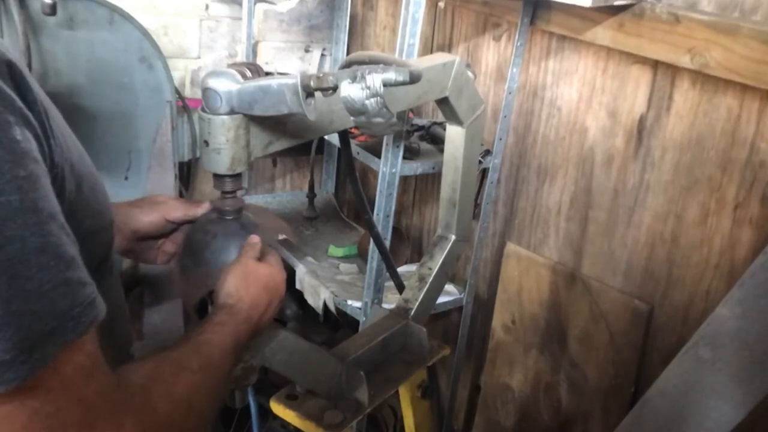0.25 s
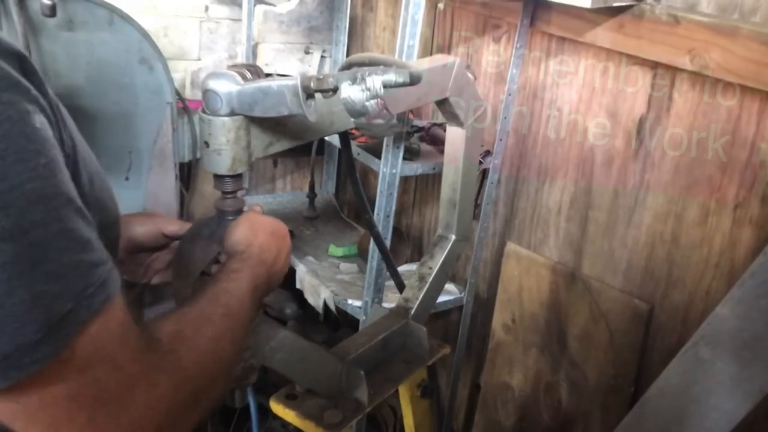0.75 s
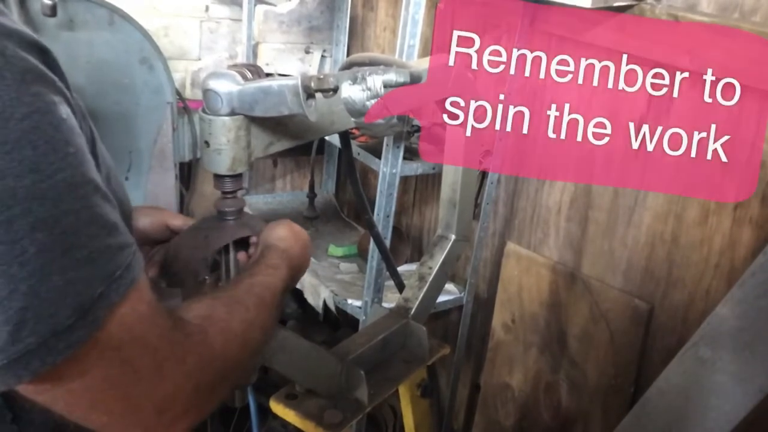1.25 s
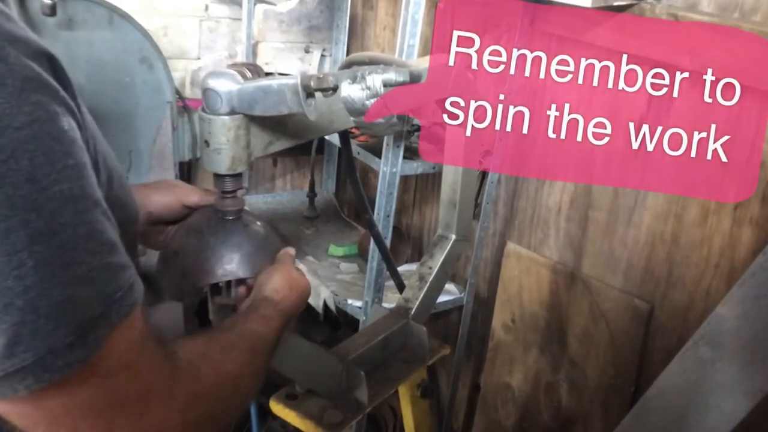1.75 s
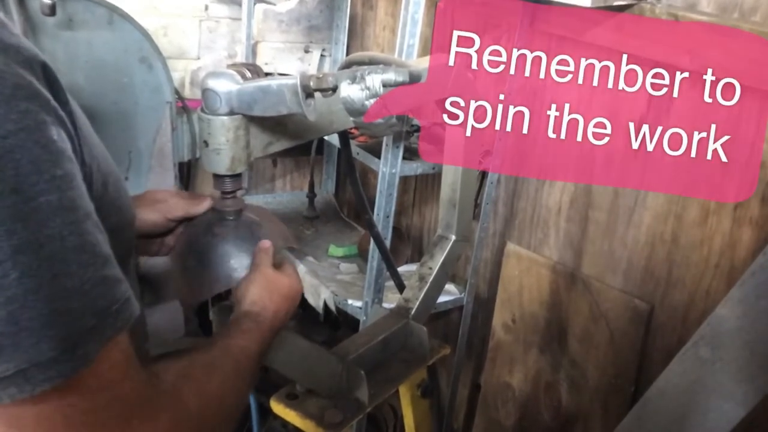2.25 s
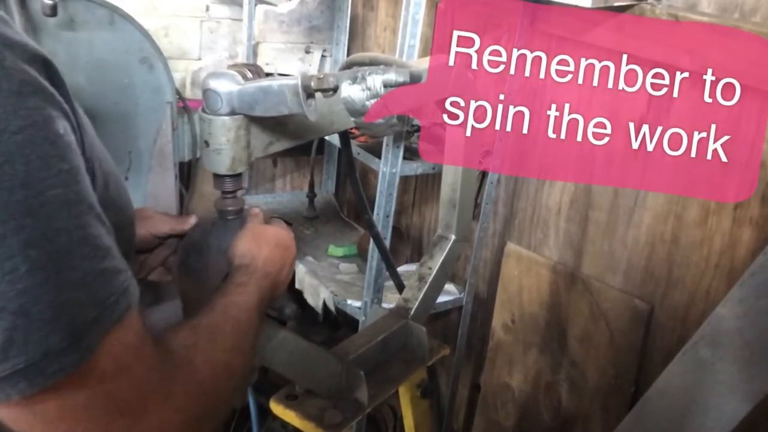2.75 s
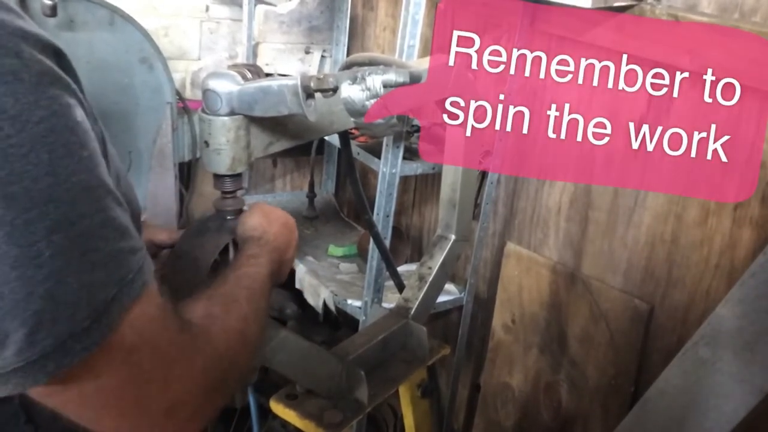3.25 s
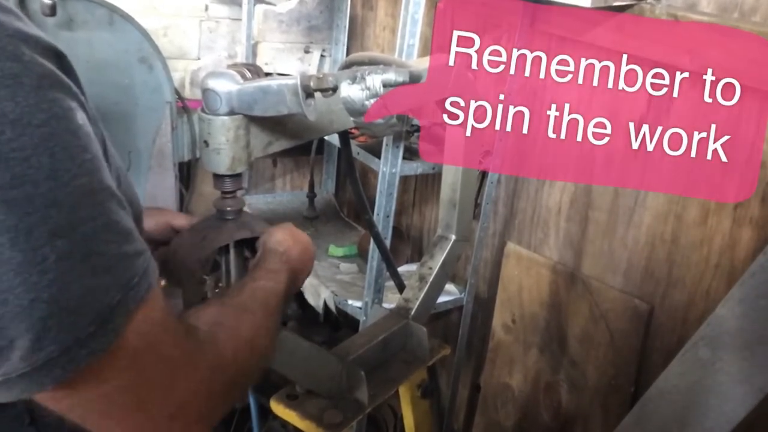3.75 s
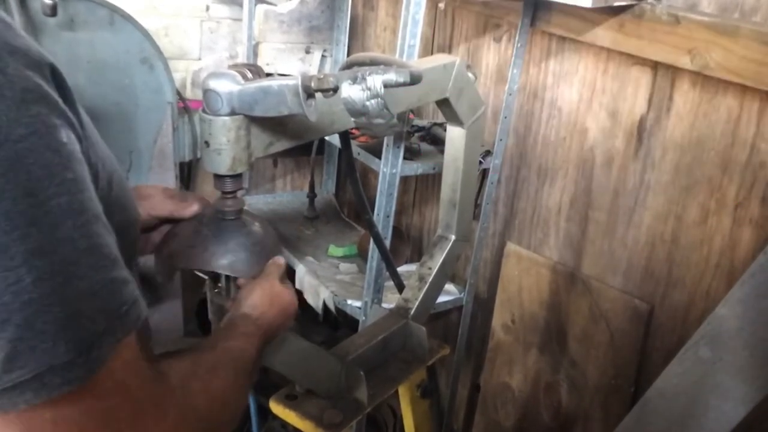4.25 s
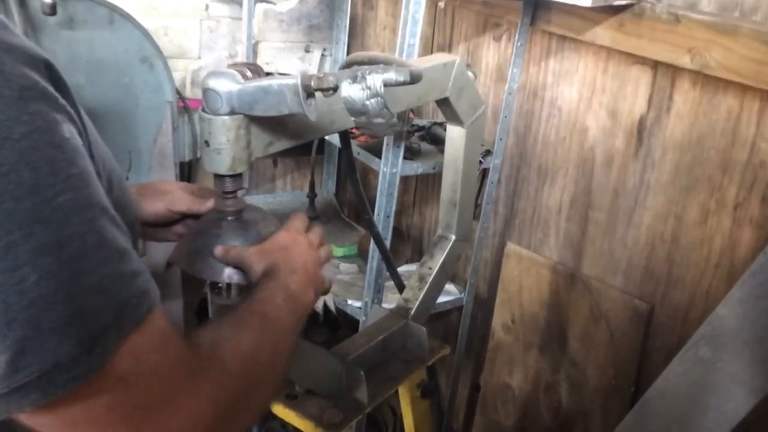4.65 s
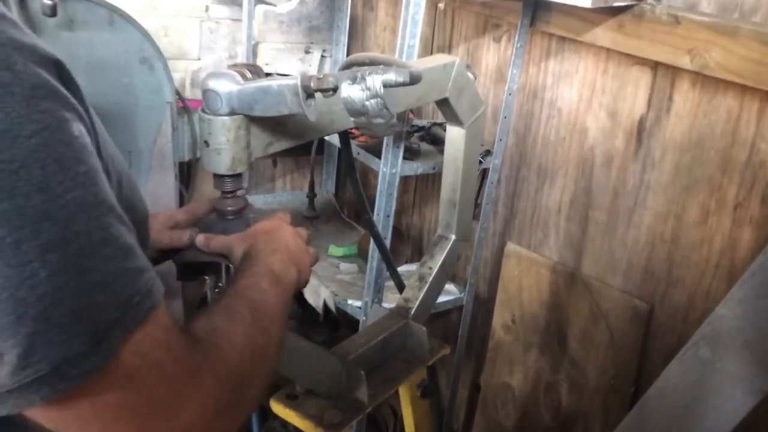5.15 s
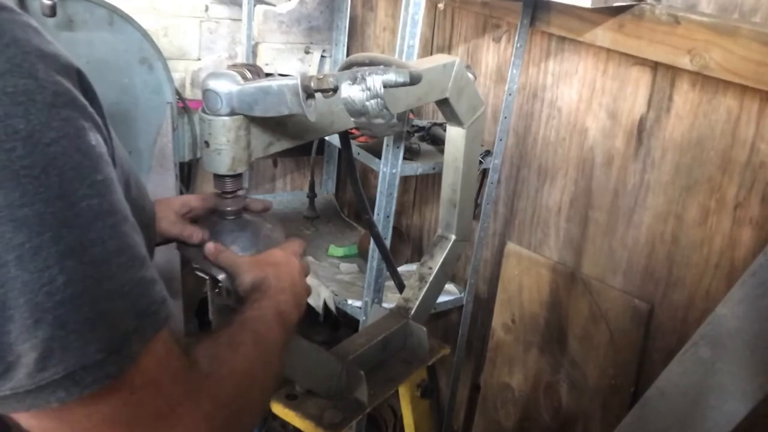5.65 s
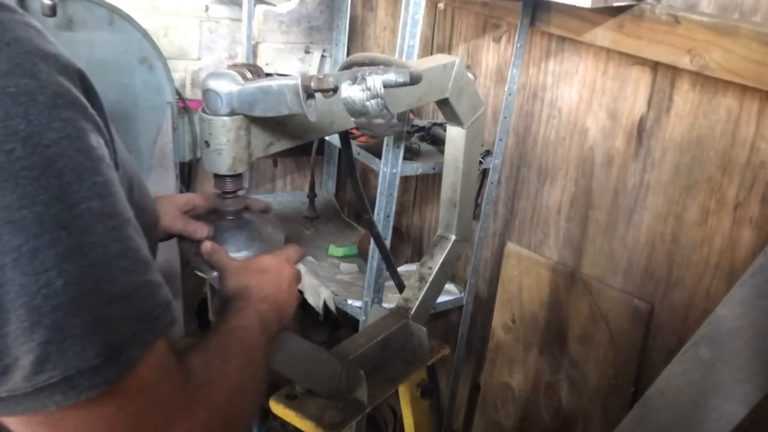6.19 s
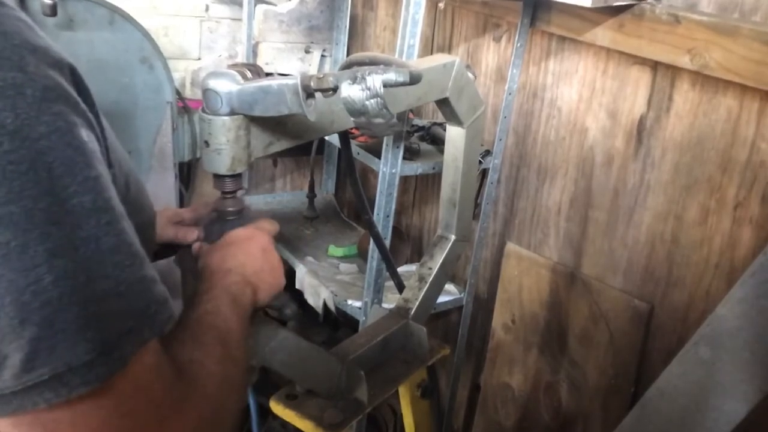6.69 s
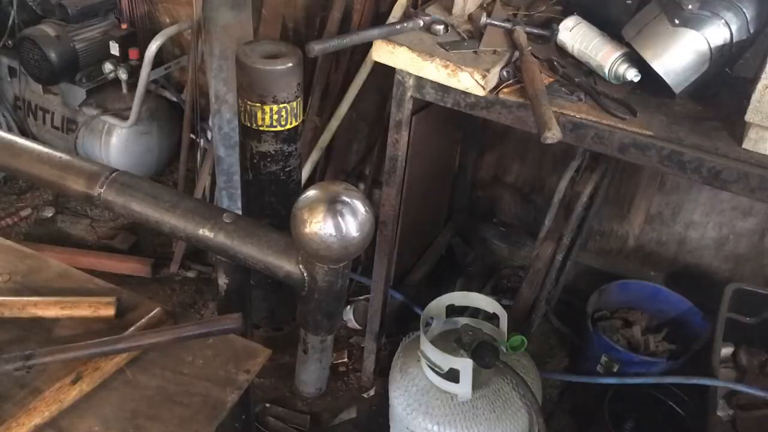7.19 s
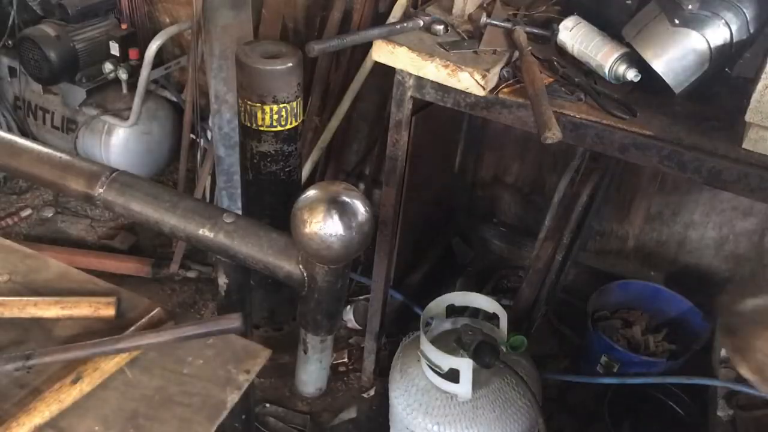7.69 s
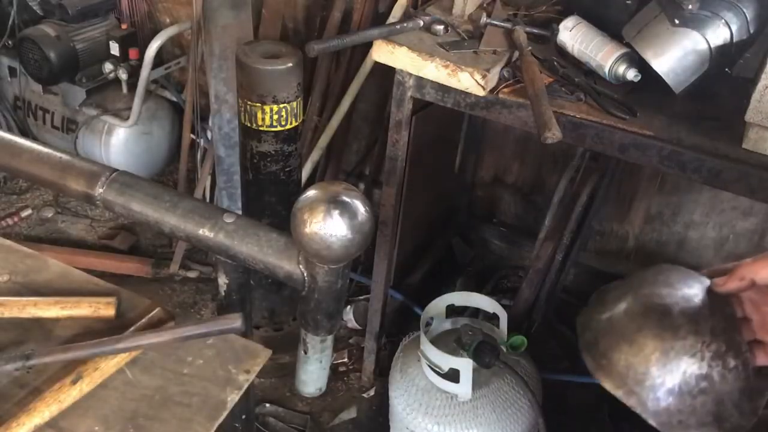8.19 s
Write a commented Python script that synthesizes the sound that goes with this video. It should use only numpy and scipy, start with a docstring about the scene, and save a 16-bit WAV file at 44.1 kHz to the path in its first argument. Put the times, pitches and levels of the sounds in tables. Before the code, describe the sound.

From the very start, a pneumatic hammer pounds a steel bowl close by in a small wooden workshop. The blows come dozens of times a second, merging into a loud, continuous metallic rattle with a bright sizzling edge and fluttering puffs of air. A compressor throbs low beneath it. The pace stumbles slightly and the tone shifts as the bowl is turned, ringing more clearly around 3 seconds and swelling and dipping unevenly between 5 and 7 seconds. At about 7.1 seconds the hammer and compressor cut off abruptly. A faint, even hiss remains, with barely audible thin, wavering high tones. Soft shuffling steps and dull handling knocks come at around 7.4 to 7.7 seconds and again from 8.1 to 8.4 seconds, with a little grit underfoot and a faint rub from the carried bowl.

```python
"""A loud metallic rattle: a pneumatic planishing hammer beats a hand-held steel bowl about 37 times a
second in a small wooden workshop. Each blow puffs air, slaps the bowl onto the anvil and excites the
modes of bowl and dies; the tone shifts as the bowl is turned. A compressor throbs behind. The sound cuts
abruptly from the din to quiet hiss, a few shuffling steps and the knocks of the bowl being carried.
Faint, thin, wavering high tones lie over the hiss; they come from nothing in the shop."""
import sys
import numpy as np
from scipy import signal
from scipy.fft import rfft, irfft, next_fast_len
from scipy.io import wavfile
from scipy.ndimage import uniform_filter1d, map_coordinates

SR = 44100
rng = np.random.default_rng(int(sys.argv[2]) if len(sys.argv) > 2 else 0)


def write(x):
    x = np.atleast_2d(x).T
    wavfile.write(sys.argv[1], SR, np.round(np.clip(x, -1, 1) * 32767).astype(np.int16))


N = 371755
TIME = np.arange(N) / SR
AGE = np.arange(8192) / SR  # seconds since an event began
CUT_S = 7.069  # the sound cuts from the din to quiet


# How firmly the die bears on the bowl. Each row: time in seconds, level in dB.
PRESSURE = [(0.0, -0.3), (0.65, -2), (0.83, 2.5), (1.96, -3.5), (2.02, 2), (2.67, -3), (2.97, 2.5),
            (4.52, -1.3), (4.63, 0.5), (5.23, -0.4), (5.35, 3.5), (5.47, -4.5), (5.76, 2.2), (6.06, -0.7),
            (6.3, 4), (6.65, -3.5), (6.89, 5), (7.07, -9.5)]
def hammer():
    """Impact excitation: each stroke vents air and strikes the bowl; firm contact rings louder."""
    times, force_db, seat_db = blows()
    press_db = np.interp(times, *np.transpose(PRESSURE))
    slap = wall_echoes(filtered(bowl_slap(times, seat_db), frame_response))
    steel = shell_clash(times, force_db, press_db)
    steel += bowl_ring(times, force_db, press_db)
    steel += die_ring(times, force_db, press_db)
    air = exhaust(times, force_db)
    return slap + steel + air + reverberation(amp(-4.5) * steel + amp(-7.5) * air + amp(-2.5) * slap)


# The piston's pace, stumbling as the bowl shifts. Each row: time in seconds, blows per second.
PISTON_RATE = [(0.0, 37.511), (1.01, 37.901), (1.66, 37.091), (1.84, 36.001), (2.08, 39.393),
               (2.14, 33.155), (2.44, 40.494), (2.67, 36.107), (3.56, 38.785), (3.68, 34.166),
               (3.8, 40.056), (4.34, 36.289), (4.4, 41.673), (4.46, 37.6), (6.24, 37.309), (6.36, 40.672),
               (6.54, 35.732), (7.07, 39.151)]
# How flush the bowl sits on the anvil. Each row: time in seconds, seating in dB.
SEATING = [(0, 2), (.38, 2.5), (1.04, -5.5), (1.13, 2.5), (1.47, 4.5), (1.64, -3.5), (1.75, 6),
           (1.96, -3.5), (2.08, 5.5), (2.6, 3.5), (3.42, -4.5), (4.02, -2.5), (4.15, 4), (4.5, 4),
           (4.87, -1), (4.94, 6.5), (5.59, 5.5), (5.76, -11.5), (6.1, 5), (6.3, -1), (6.45, 4.5),
           (6.92, -2), (6.99, 7)]
# Hard or glancing blows. Each row: time in seconds, extra force in dB, extra seating in dB.
ACCENTED_BLOWS = [(.16, 3, 1.5), (.34, 1.5, 4.5), (.74, 1.5, 0), (.9, 3.5, 1), (1.03, -5.5, -3),
                  (1.05, 1, 4.5), (1.29, 5, -2.5), (1.5, 3, 1.5), (1.67, 7, -1), (1.72, 6.5, 0.5),
                  (1.86, -9, -5), (1.91, 4, 5.5), (2.05, 4.5, 1.5), (2.48, 5, 1), (2.63, 1, 1),
                  (2.74, 3.5, -1), (2.88, 2, 1), (2.96, 3.5, 2.5), (3.01, 3.5, 3.5), (3.39, -1.5, -3),
                  (3.76, 1.5, -13), (3.94, 2.5, 3.5), (4.22, 2, 1.5), (4.84, -6, -1.5), (4.92, 4, 0),
                  (5.5, 5, 3), (5.58, -1.5, 1), (5.61, 2, 1.5), (5.71, 0.5, 6.5), (5.85, -1.5, 14.5),
                  (5.9, 0.5, 12), (5.98, 3, -6), (6.03, -3, 7), (6.06, -4, 1.5), (6.12, 3, 0.5),
                  (6.38, 1.5, 1.5), (6.7, -0.5, 4.5), (7.02, -2, -1.5)]
def blows(flush_db=10, rock_range_db=6, square_hit_db=2):
    """An impulse train: each blow's time, force and seating. A badly seated bowl rocks unevenly."""
    strokes = np.cumsum(np.interp(TIME, *np.transpose(PISTON_RATE))) / SR + .29
    times = TIME[1:][np.diff(np.floor(strokes)) > 0]
    times = times[times < CUT_S]
    slip, force, rock = rng.standard_normal((len(times), 3)).T
    times = times + .0004 * slip
    seat_db = np.interp(times, *np.transpose(SEATING))
    looseness = np.clip((flush_db - seat_db) / rock_range_db, 0, 1)
    force_db = np.minimum(2.5 * force, square_hit_db)
    rock_db = 3 * looseness * rock
    for when, accent_force_db, accent_seat_db in ACCENTED_BLOWS:
        blow = np.argmin(np.abs(times - when))
        force_db[blow], rock_db[blow] = accent_force_db, accent_seat_db
    return times, force_db, np.minimum(seat_db + rock_db, flush_db)


# The bowl's thud on the anvil. Each row: frequency in Hz, spectral density in dB.
SLAP_SPECTRUM = [(150, -57.5), (350, -14.5), (620, -20), (850, 0.5), (1100, 0.5), (1450, 0), (1800, -7.5),
                 (2300, -6.5), (3200, -57), (5000, -38)]
def bowl_slap(times, seat_db, dispersion=0.0988):
    """Dispersion: high bending waves outrun low ones, so each slap falls in pitch."""
    hz = np.fft.rfftfreq(len(AGE), 1 / SR)
    wave = irfft(amp(along(SLAP_SPECTRUM, hz)) * np.exp(-2j * np.pi * dispersion * np.sqrt(hz)))
    wave *= AGE < AGE[-1] / 2
    return place(times, -14 + 1.306 * seat_db, wave / np.abs(wave).max())  # flusher is heavier


# Modes of the frame and stand. Each row: frequency in Hz, bandwidth in Hz, gain in dB.
FRAME_MODES = [(614.5, 37, 8.5), (822, 14, -0.5), (962, 16, 1), (1081, 6.2, 4.5), (1216, 53, -3.5),
               (1455, 10, -12.5), (1551, 10, -3), (1792, 13, 1), (1920, 23, 8)]
def frame_response(hz):
    """Forced resonance: the slap passes straight on and also drives the frame's modes."""
    return 1 + sum(amp(db) * 1j * hz * width / (mode * mode - hz * hz + 1j * hz * width)
                   for mode, width, db in FRAME_MODES)


# The shell's clash and its higher sizzle. Each row: frequency in Hz, spectral density in dB.
CLASH_SPECTRUM = [(300, -29.5), (600, -0.5), (1000, -5.5), (1900, 0), (2800, 2.5), (3700, 0), (4500, 2.5),
                  (5100, -1), (5900, 4.5), (7200, 1), (9000, -16), (12000, -21.5)]
SIZZLE_SPECTRUM = [(4000, -25.5), (6500, -6), (9500, -3.5), (10400, 0.5), (11400, 4), (12600, 7.5),
                   (14000, -1.5), (14700, 20), (15250, -5), (16000, 6)]
def shell_clash(times, force_db, press_db):
    """High modal density: the shell's crowded modes merge into bursts of noise."""
    clash = bursts(times, CLASH_SPECTRUM, t60=0.076, attack=0.00069, ripple_db=2.5, chatter=0.0062)
    sizzle = bursts(times, SIZZLE_SPECTRUM, t60=0.048, attack=0.00018, ripple_db=4.5, chatter=0.0011)
    return (place(times, -21 + 1.07 * press_db + force_db, clash)
            + place(times, -13.5 + 0.79 * press_db + force_db, sizzle))


# The rim's dense modes. Each row: frequency in Hz, spectral density in dB.
RIM_SPECTRUM = [(6000, -27), (7400, -30.5), (7720, -1.5), (7950, -10), (8550, 1.5), (8900, -22.5),
                (9250, -1.5), (11000, -27)]
# Clear notes of body and rim. Each row: frequency in Hz, level in dB, 60 dB decay time in seconds.
BODY_MODES = [(1850, -30, .085), (2150, -39, .07), (2305, -31, .07), (2845, -30.5, .06), (3100, -38, .07)]
RIM_MODES = [(8600, -25, .03), (8848, -21, .08)]
# The body rings out when tilted on edge, the rim as it turns. Each row: time in seconds, level in dB.
BODY_LEVEL = [(0, -7.5), (2.852, -1), (3.0, 6.5), (3.301, 7.5), (3.5, -15), (7.07, -6.5)]
RIM_TURNING = [(0, 0), (1.0, -5), (1.7, 2.5), (2.1, 1), (2.5, -3.5), (3.1, -1), (3.4, 2), (4.7, 2),
               (5.45, -4.5), (6.15, -4), (6.85, 3)]
def bowl_ring(times, force_db, press_db):
    """Free vibration: body and rim ring after each blow, as strongly as the bowl's position allows."""
    body_db = np.interp(times, *np.transpose(BODY_LEVEL)) + force_db / 2
    rim_db = np.interp(times, *np.transpose(RIM_TURNING)) + 1.57 * press_db + force_db
    shimmer = bursts(times, RIM_SPECTRUM, t60=0.026, attack=0.00052, ripple_db=4, chatter=0.0064)
    body = ringing(times, BODY_MODES, scatter_db=2.5, detune=0.0025)
    rim = ringing(times, RIM_MODES, scatter_db=3.5, detune=0.0015)
    return place(times, rim_db - 23.5, shimmer) + place(times, body_db, body) + place(times, rim_db - 5, rim)


# Notes of anvil and hammer die. Each row: frequency in Hz, level in dB, 60 dB decay time in seconds.
ANVIL_MODES = [(6404, -19, 0.062), (6485, -18, 0.069)]
DIE_MODES = [(14812, -15, .07), (14790, -17, .025)]
def die_ring(times, force_db, press_db):
    """Normal modes: small, stiff blocks of steel ring at a few high frequencies."""
    anvil = ringing(times, ANVIL_MODES, scatter_db=4.5, detune=0.0031)
    die = ringing(times, DIE_MODES, scatter_db=6, detune=0.00108)
    return place(times, -4 + press_db + 0.85 * force_db, anvil) + place(times, -5.5 + force_db, die)


# The vented air. Each row: frequency in Hz, spectral density in dB.
EXHAUST_SPECTRUM = [(35, -28), (70, -4.5), (130, -3.5), (165, -16), (220, -6.5), (280, -5.5), (350, -3),
                    (480, -3), (700, -12), (1500, -14)]
def exhaust(times, force_db, pop_hz=250, lead_s=0.004):
    """Sudden expansion: the port opens just before the die lands, with a low pop and a short rush."""
    pop = np.sin(2 * np.pi * pop_hz * AGE) * AGE * np.exp(-AGE / 0.0019)
    opening = times - lead_s + 0.00077 * rng.standard_normal(len(times))
    rush = bursts(times, EXHAUST_SPECTRUM, t60=0.11, attack=0.00034, ripple_db=1.9)
    return place(opening, force_db / 10 - 24, pop / pop.max() + rush)


# Echoes off the bench and wooden walls. Each row: delay in seconds, linear gain.
REFLECTIONS = [(.00275, 0.18), (.0035, 0.23), (.0058, -0.11), (0.0106, 0.036), (0.0112, 0.3), (0.0107, .16),
               (.01455, -0.084), (0.0204, 0.034)]
def wall_echoes(x):
    """Early reflection: nearby surfaces return delayed, weaker copies."""
    return x + sum(gain * np.pad(x, (round(delay * SR), 0))[:N] for delay, gain in REFLECTIONS)


# The workshop's decay. Each row: frequency in Hz, reverberation time in seconds.
ROOM_DECAY = [(100, 0.55), (1000, 0.33), (5000, 0.2), (15000, 0.34)]
def reverberation(x):
    """A diffuse field: a short noisy tail, drawn afresh every 0.2 s so no steady colour builds up."""
    block, predelay = SR // 5, SR // 300
    out = np.zeros(N + SR)
    for start in range(0, N, block):
        hz, t, noise = signal.stft(rng.standard_normal(SR // 3), SR, nperseg=256)
        decay = amp(-60 * t / along(ROOM_DECAY, hz)[:, None])
        tail = signal.istft(noise * decay, SR, nperseg=256)[1]
        wet = signal.fftconvolve(x[start:start + block], tail / np.linalg.norm(tail))
        out[start + predelay:][:len(wet)] += wet
    return out[:N]


# The pump's throb. Each row: harmonic number of the stroke rate, level in dB.
PUMP_HARMONICS = [(3, -53), (4, -52.5), (13, -40.5), (14, -36.5), (15, -38.5), (16, -70.5), (17, -51)]
def compressor(stroke_hz=24.256, motor_hz=51.5):
    """A harmonic series: pump strokes throb in the intake's resonance over a steady motor hum."""
    turns = stroke_hz * TIME + 0.0043 * wobble(3)
    pump = sum(amp(db + wobble(3.2)) * np.cos(2 * np.pi * round(k) * turns) for k, db in PUMP_HARMONICS)
    motor = amp(-37.5 + 0.46 * wobble(4)) * np.sin(2 * np.pi * motor_hz * TIME)
    return np.sqrt(2) * (pump + motor)


# Steps and handling knocks. Each row: start in seconds, relative level in dB, scuff offset in dB.
FOOTFALLS = [(7.392, -38, -28), (7.414, -44, -14), (7.481, -32, -11.5), (7.504, -35, -18), (7.689, -54, -3),
             (8.137, -36, -14), (8.179, -51, -10), (8.28, -37, -15), (8.334, -49.5, -1.5), (8.409, -54, -2)]
# Thump, scuff and grit under a shoe. Each row: frequency in Hz, spectral density in dB.
THUMP_SPECTRUM = [(30, -14), (70, -8), (130, -10), (215, -2), (330, -14), (600, -23.5), (1500, -40)]
SCUFF_SPECTRUM = [(200, -9), (500, 4), (1300, 7), (2400, -5), (4000, -12), (9000, -25), (15000, -22)]
GRIT_SPECTRUM = [(3000, -20), (6000, -3), (9000, 5), (12000, -4), (16000, -12)]
def steps(grit_s=8.152, rub_start_s=8.23):
    """Impact and friction: shoes thump and scuff the floor, then the carried bowl rubs."""
    times, db, scuff_db = np.transpose(FOOTFALLS)
    thump = bursts(times, THUMP_SPECTRUM, t60=0.26, attack=0.0025, ripple_db=5, chatter=0.0036)
    scuff = bursts(times, SCUFF_SPECTRUM, t60=0.22, attack=0.00073, ripple_db=8)
    grit = bursts([grit_s], GRIT_SPECTRUM, t60=0.18, attack=0.004, ripple_db=2)
    rub = coloured_noise(SCUFF_SPECTRUM) * amp(-63 + 3.7 * wobble(46))
    rub *= np.clip((TIME - rub_start_s) / .04, 0, 1)
    return (place(times, db - 11, thump) + place(times, db + scuff_db + 1.5, scuff)
            + place([grit_s], [-47], grit) + rub)


# The background hiss. Each row: frequency in Hz, spectral density in dB.
HISS_SPECTRUM = [(15, -27), (25, -5), (55, 4.5), (102, -3.5), (222, -3), (425, -8), (1250, -9.5),
                 (2150, -15), (3300, -8.5), (4950, -14), (6850, -8), (8970, -10.5), (11100, -7),
                 (14200, -4.5), (15800, -15.5)]
def hiss():
    """Stationary noise: a faint, even background."""
    return amp(-55) * coloured_noise(HISS_SPECTRUM)


# Faint high tones. Each row: frequency in Hz, level in dB.
HIGH_TONES = [(6029, -73), (10804, -73), (13857, -72)]
def wavering_tones():
    """Random modulation: thin high tones, from nothing in the shop, waver in level and phase."""
    return sum(np.sqrt(2) * amp(db + 2 * wobble(20)) * np.sin(2 * np.pi * (hz * TIME + .3 * wobble(60)))
               for hz, db in HIGH_TONES)


def bursts(times, spectrum, t60, attack, ripple_db, chatter=0):
    """Exponential decay of one noise burst per event, held up for about chatter seconds by rebounds."""
    hz, t = np.fft.rfftfreq(len(AGE), 1 / SR), AGE.astype(np.float32)
    white, ripple = [rng.standard_normal((len(times), len(axis)), np.float32) for axis in (AGE, hz)]
    # neighbouring events favour the same modes
    ripple = unit(uniform_filter1d(uniform_filter1d(ripple, size=36, axis=1), size=3, axis=0))
    cloud = unit(irfft(rfft(white) * amp(along(spectrum, hz).astype(np.float32) + ripple_db * ripple)))
    hold = 2 * chatter * rng.random((len(times), 1), np.float32)
    return cloud * amp(-60 * np.maximum(t - hold, 0) / t60) * (1 - np.exp(-t / attack))


def ringing(times, modes, scatter_db, detune):
    """Damped oscillators, with new strength, phase and slight detuning at each blow."""
    t, out = AGE.astype(np.float32), 0
    for hz, db, t60 in modes:
        size, bend, phase = rng.standard_normal((len(times), 3)).astype(np.float32).T[:, :, None]
        envelope = amp(db + scatter_db * size) * amp(-60 * t / t60)
        out = out + envelope * np.sin(2 * np.pi * (hz * (1 + detune * bend) * t + phase))
    return out


def place(times, levels_db, sounds):
    """Superposition: one sound per event, summed at its time and level."""
    at = np.maximum(np.round(np.asarray(times) * SR), 0).astype(int)[:, None] + np.arange(len(AGE))
    return np.bincount(at.ravel(), (amp(levels_db)[:, None] * sounds).ravel(), N)[:N]


def coloured_noise(spectrum):
    """White noise shaped to a spectrum, at rms 1."""
    return unit(filtered(rng.standard_normal(N), lambda hz: amp(along(spectrum, hz))))


def filtered(x, response):
    """Linear filtering: the spectrum of x times a frequency response."""
    size = next_fast_len(N + SR // 2)
    return irfft(rfft(x, size) * response(np.fft.rfftfreq(size, 1 / SR)), size)[:N]


def wobble(rate):
    """A smooth random curve with rate knots a second."""
    coarse = TIME[::32]
    knots = rng.standard_normal(int(N * rate / SR) + 4)
    return np.interp(TIME, coarse, map_coordinates(knots, [coarse * rate]))


def along(points, hz):
    """Interpolation of (Hz, value) points on a log frequency axis."""
    freqs, values = np.transpose(points)
    return np.interp(np.log(hz + 1), np.log(freqs + 1), values)


def amp(db):
    """Decibels to gain."""
    return 10 ** (np.asarray(db) / 20)


def unit(x):
    """Scale to rms 1."""
    return x / np.sqrt(np.mean(x ** 2) + 1e-20)


def scene():
    """The layers add; the sound cuts abruptly from the din to quiet hiss and steps."""
    before_cut = np.clip((CUT_S - TIME) / 0.0044 + .5, 0, 1)
    background = hiss()
    return (before_cut * (hammer() + compressor()) + steps() + background + wavering_tones())[None]


def record(dry):
    """Saturation rounds off the highest peaks, and a low-pass filter limits the band."""
    cutoff_hz = 15850
    rounded = dry[0] / (1 + np.abs(dry[0]) ** 6) ** (1 / 6)
    return filtered(rounded, lambda hz: np.clip((cutoff_hz - hz) / 300 + .5, 0, 1))[None]


dry = scene()
out = record(dry)
write(out)
```